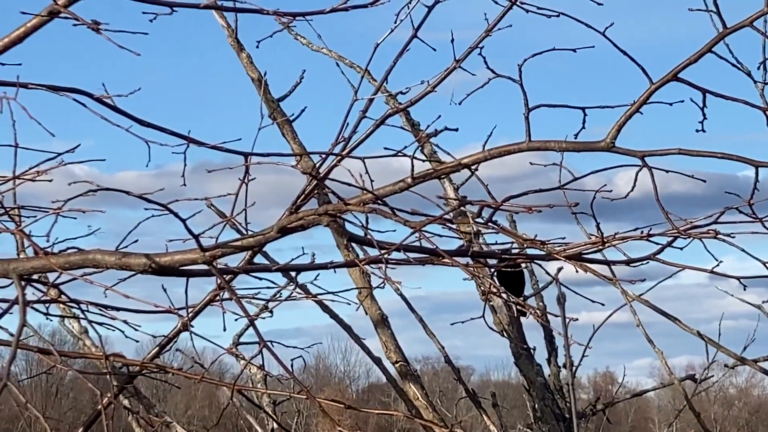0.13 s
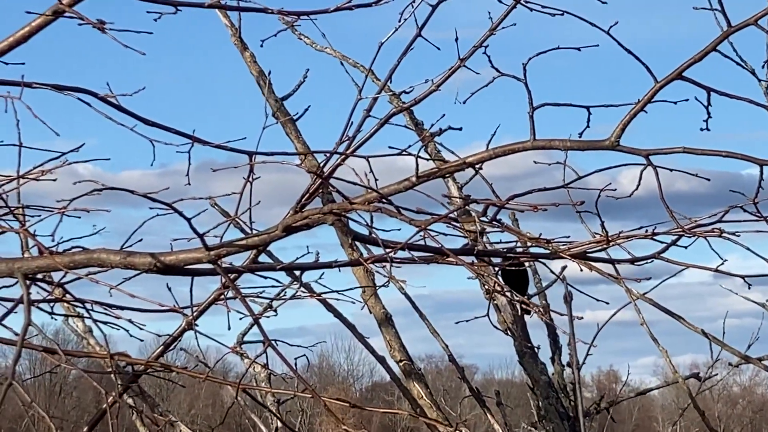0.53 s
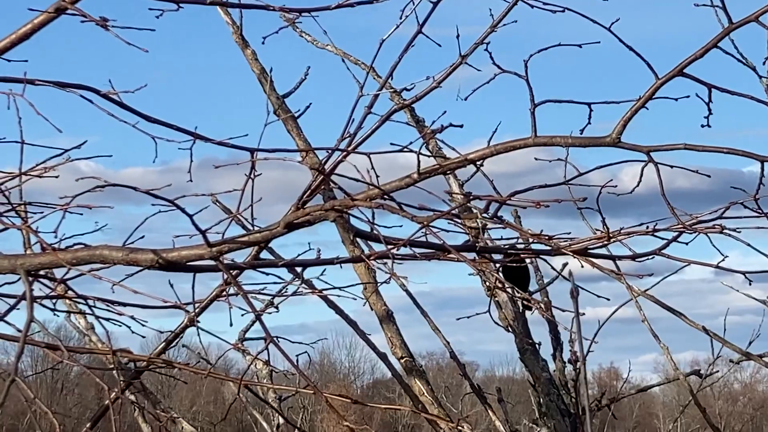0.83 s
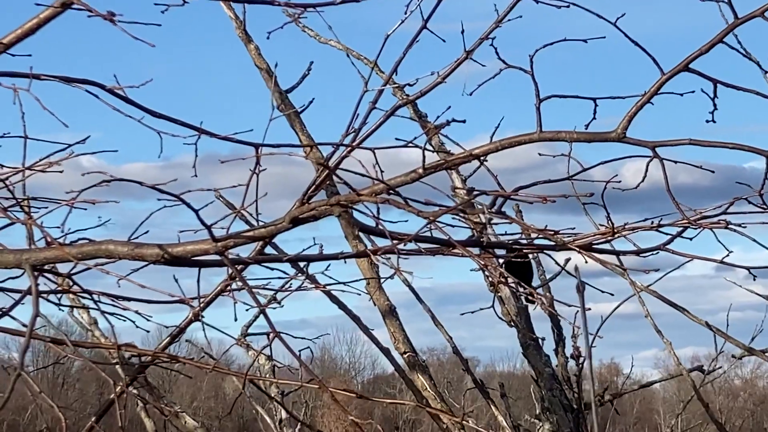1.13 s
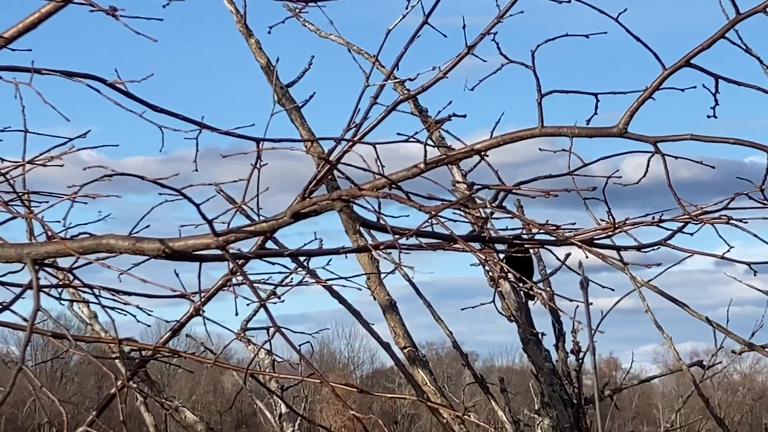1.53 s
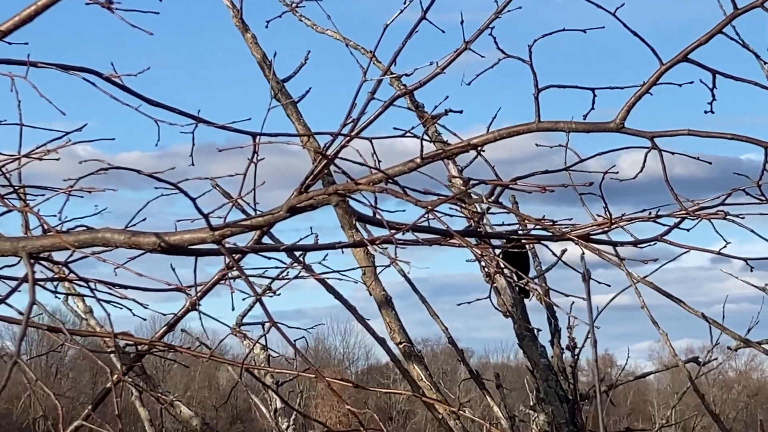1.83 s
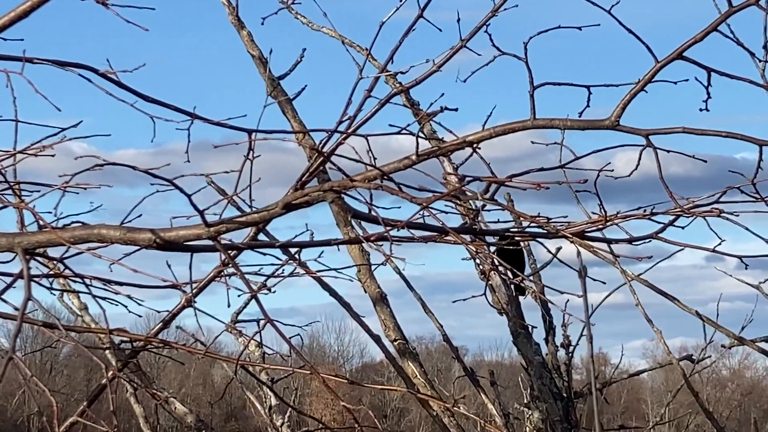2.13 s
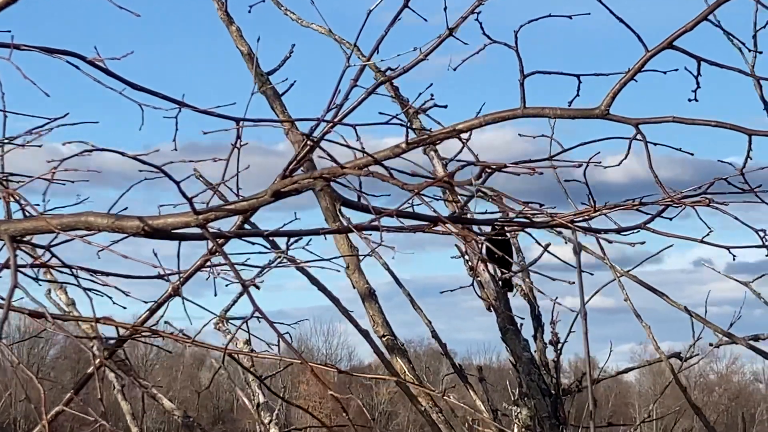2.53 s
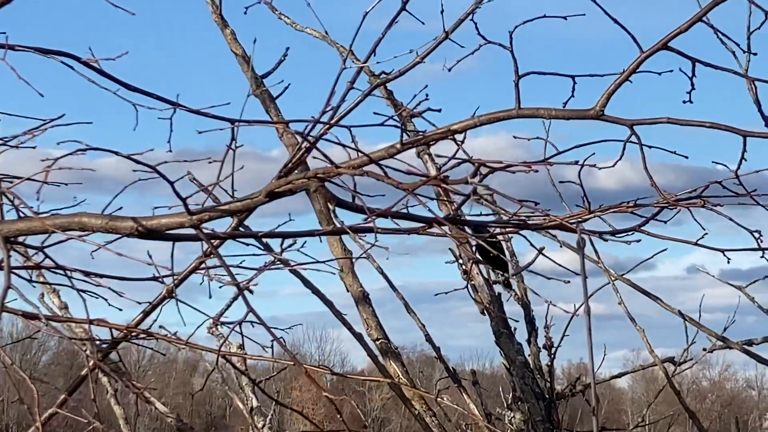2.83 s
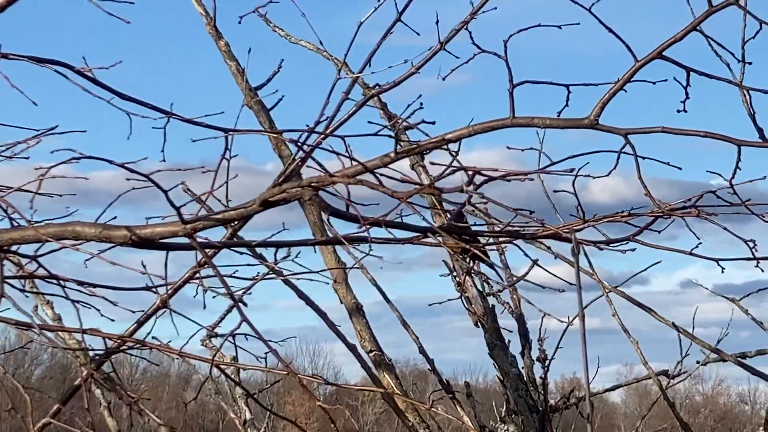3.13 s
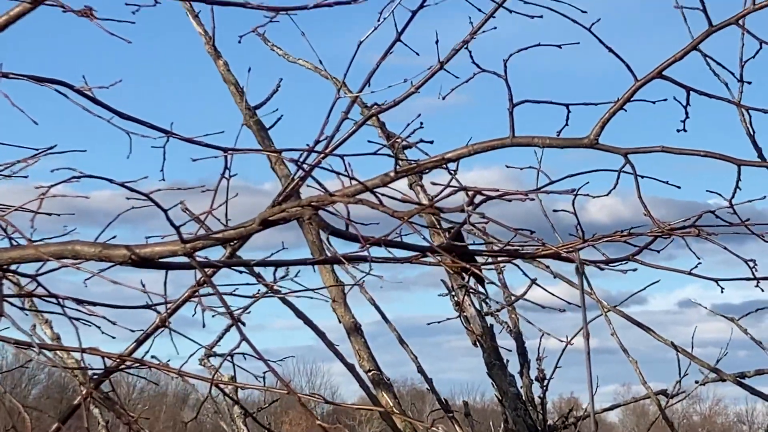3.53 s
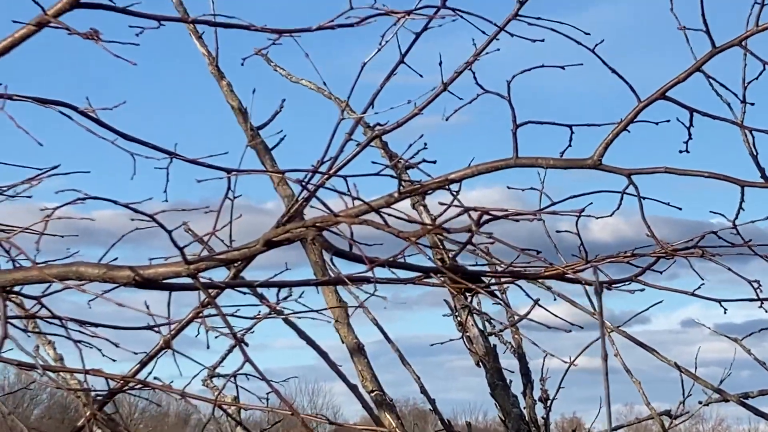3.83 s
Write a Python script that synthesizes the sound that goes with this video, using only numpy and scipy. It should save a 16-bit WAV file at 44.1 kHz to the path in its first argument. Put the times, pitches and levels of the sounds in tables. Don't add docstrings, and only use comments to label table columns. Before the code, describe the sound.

A blackbird's sharp chack, then a gurgle and buzzy trill, over rising wind rumble outdoors

```python
import sys
import numpy as np
from scipy import signal
from scipy.fft import rfft, irfft
from scipy.io import wavfile
from scipy.ndimage import uniform_filter1d

SR = 44100
rng = np.random.default_rng(int(sys.argv[2]) if len(sys.argv) > 2 else 0)


def rack_gain(trim_db):
    fader = np.asarray(trim_db, float)
    return 10 ** (fader / 20)


def wav_out(sig):
    wavfile.write(sys.argv[1], SR, np.round(np.clip(np.atleast_2d(sig).T, -1, 1) * 32767).astype(np.int16))


N = 176400
T = np.arange(N) / SR
FREQS = np.arange(N // 2 + 1) * SR / N
OPPOSITE = np.array([[1], [-1]])


def unit(x):
    return x / np.sqrt(np.mean(x ** 2))


def noise():
    return rng.standard_normal(N)


def band(x, lo_hz, hi_hz, order=2):
    edges = [max(lo_hz, 20), min(hi_hz, SR * .45)]
    return signal.sosfilt(signal.butter(order, edges, "band", fs=SR, output="sos"), x)


def resonance(x, hz, width_hz):
    return band(x, hz - width_hz / 2, hz + width_hz / 2)


def shape(at, attack, hold, release):
    t = T - at
    rise = np.sin(np.pi / 2 * np.clip(t / attack, 0, 1)) ** 2
    return rise * np.exp(-np.clip(t - attack - hold, 0, None) / release)


def tone(hz):
    return np.sqrt(2) * np.sin(2 * np.pi * np.cumsum(hz) / SR)


def walk(rate):
    k = int(SR / rate)
    return unit(uniform_filter1d(uniform_filter1d(noise(), k), k))


def coloured(points):
    p = np.array(points)
    db = np.interp(np.log(FREQS + 1), np.log(p[:, 0]), p[:, 1], left=-60, right=-90)
    return unit(irfft(rfft(noise()) * rack_gain(db), N))


def pan(x, db, lag_s):
    late = irfft(rfft(x) * np.exp(-2j * np.pi * FREQS * lag_s), N)
    return np.array([x * rack_gain(db / 2), late * rack_gain(-db / 2)])


def burst(rows, kernel):
    out = np.zeros(N + SR)
    for s, db, *rest in rows:
        k = kernel(*rest)
        start = int(s * SR)
        out[start:start + len(k)] += rack_gain(db) * k
    return out[:N]


# (frequency [Hz], level [dB])
ROAD_COLOUR = [(88, -34.5), (150, -1), (588, -5.5), (1160, -11.5), (3640, -40), (4500, -63), (5850, -73.5),
               (9900, -120)]
# (centre [Hz], width [Hz], level [dB])
HISS_HUMPS = [(4500, 5700, -88.5), (6120, 810, -85), (8000, 14000, -90), (10840, 1500, -91)]


def traffic():
    wide_treble = band(coloured(ROAD_COLOUR), 830, 15000) * rack_gain(-1.0)
    wide_bass = band(coloured(ROAD_COLOUR), 110, 900) * rack_gain(-8.5)
    road = coloured(ROAD_COLOUR) + (wide_treble + wide_bass) * OPPOSITE
    hiss = 0
    for hz, width_hz, db in HISS_HUMPS:
        hump = resonance(rng.standard_normal((2, N)), hz, width_hz)
        hiss = hiss + rack_gain(db) * hump * np.sqrt(SR / 2 / width_hz)
    whine = rack_gain(-93) * tone(10050 + 0 * T) * (T < 1.9)
    swell_db = .8 * walk(0.86)
    return rack_gain(-56.5 + swell_db) * road + hiss + whine


GUST_HZ = 83.92
# (time [s], peak level [dB], start pitch [octaves over the gust tone])
EDDIES = [(1.066, -40, 2.13), (1.637, -46, 2.5), (1.774, -45, 2.2), (2.023, -43, 2.03), (2.141, -34.5, 2.1),
          (2.217, -40, 2.12), (2.302, -43, 2.2), (2.357, -38, 2.03), (2.461, -40.5, 2.17),
          (2.598, -27.5, 2.15), (2.71, -43, 1.8), (2.79, -42.5, 1.9), (2.83, -19, 2.22),
          (2.856, -21.5, 2.1), (2.946, -29.5, 1.96), (2.979, -24.5, 1.97), (3.033, -44, 2.1),
          (3.097, -42, 2.26), (3.131, -42, 2.6), (3.194, -43, 2), (3.334, -38, 2.1), (3.403, -42.5, 2.1),
          (3.472, -32, 2.06), (3.505, -29, 2.4), (3.547, -26.5, 2.24), (3.556, -26.5, 2.37),
          (3.637, -32.5, 2.4), (3.657, -26, 2.06), (3.682, -36.5, 2.24), (3.72, -42.5, 2.6),
          (3.771, -31.5, 2.04), (3.803, -22.5, 2.3), (3.825, -22.5, 2.23), (3.907, -31, 3),
          (3.935, -26, 2.33)]


def snaps():
    t = T[:SR // 12]
    envelope = shape(0, 0.0023, 0.0011, 0.013)[:len(t)]
    fall_oct = 1.254 * (np.exp(-t / 0.016) - 1)

    def eddy(octaves):
        hz = GUST_HZ * 2 ** (octaves + fall_oct)
        return envelope * np.sin(2 * np.pi * np.cumsum(hz) / SR)

    return rack_gain(-2) * burst(EDDIES, eddy)


# (time [s], rumble level [dB], twig rustle level [dB])
WIND_RISE = [(0, -47, -65.5), (.6, -43, -62), (1., -49, -62.5), (1.5, -48, -67), (1.9, -44.5, -60),
             (2.2, -40.5, -58), (2.598, -35.5, -55), (3.001, -30, -56.5), (3.399, -35.5, -54),
             (3.599, -32.5, -55), (4, -25.5, -54.5)]
# (time [s], peak level [dB], decay [s], pitch fall [octaves])
PORT_GUSTS = [(1.072, -26, 0.057, 0.85), (1.188, -33, 0.014, 0.28), (1.601, -33, .04, 0.31),
              (1.636, -29.5, 0.053, 0.71), (2.139, -32, 0.025, 1.7), (2.356, -35.5, 0.029, 1.5),
              (2.46, -31, 0.041, 1.7), (2.603, -16, 0.032, 1.4), (2.683, -24, 0.044, 1.5),
              (2.773, -24, 0.087, 1.7), (2.832, -15, 0.022, 1.7), (2.885, -19, 0.043, .7),
              (2.946, -25.5, 0.063, 1.7), (3.04, -31.5, 0.2, 1.7), (3.115, -15, 0.016, 1.5),
              (3.191, -28, 0.03, 1.7), (3.332, -18, 0.02, 0.94), (3.407, -24.5, 0.05, 1.23),
              (3.438, -22, 0.048, 1.7), (3.499, -20, 0.083, 1.681), (3.545, -22.5, 0.057, 1.5),
              (3.595, -24, 0.027, 1.2), (3.653, -26, 0.05, 1.9), (3.725, -30, 0.054, 1.7),
              (3.783, -15.5, 0.058, 1.5), (3.843, -22.5, 0.09, 1.3), (3.899, -13.5, 0.034, 1.7)]
# (frequency [Hz], density [dB per Hz])
RUMBLE_COLOUR = [(12, -52), (20, -6), (81, 5), (235, -22), (600, -32), (780, -42), (1320, -120)]


def wind():
    s, rumble_db, rustle_db = np.array(WIND_RISE).T
    flutter_db = 2.5 * np.clip(walk(34), -2, 1)
    size = rack_gain(np.interp(T, s, rumble_db) + flutter_db)
    wobble = walk(71.7)
    grain = 0.85 + np.tanh(0.98 * walk(274))
    mid = size * coloured(RUMBLE_COLOUR) + snaps()
    for at, peak_db, decay, octaves in PORT_GUSTS:
        swell = rack_gain(peak_db - 7) * shape(at - .004, 0.017, 0.00087, decay)
        fall_oct = octaves * np.exp(-np.clip(T - at, 0, 1) / 0.02406)
        mid = mid + swell * grain * tone(GUST_HZ * 2 ** (fall_oct + .25 * wobble))
        size = size + swell
    limit = .15
    buffet = band(limit * np.tanh(mid / limit), 31.0, 1200)
    crackle = rack_gain(np.interp(T, s, rustle_db) + 1.7 * walk(36) + 2 * walk(210))
    rustle = crackle * np.array([unit(band(noise(), 420, 1547)) for _ in range(2)])
    port_difference = rack_gain(-9) * size * coloured(RUMBLE_COLOUR) * OPPOSITE
    return buffet + rustle + port_difference


# (time [s], peak level [dB])
REED_CRACKS = [(2.0248, -49.5), (2.0686, -43), (2.088, -46.5), (2.144, -45), (2.192, -44), (2.2413, -39),
               (2.31, -54), (2.3248, -45.5), (2.355, -40.5), (2.3795, -46.5), (2.4065, -53.5),
               (3.5773, -33.5), (3.755, -49.5)]


def reeds():
    swell = burst(REED_CRACKS, lambda: rack_gain(-60 * T[:SR // 20] / 0.0073))
    return rack_gain(-14.5) * swell * np.array([unit(band(noise(), 1000, 1800, order=1)) for _ in range(2)])


# (time [s], level [dB], centre [Hz], width [Hz], 60 dB decay [s])
TWIG_TICKS = [(.583, -42, 1236, 1490, 0.033), (0.5848, -64, 5350, 3980, 0.12),
              (1.0286, -56.5, 8000, 8000, 0.064), (1.598, -67, 6320, 4980, 0.041),
              (2.9233, -54.5, 7570, 1190, 0.0081), (2.9367, -50.5, 7140, 1196, 0.012),
              (2.9552, -57, 7280, 1176, 0.061), (2.9558, -57, 10670, 1910, 0.024),
              (3.406, -64, 4500, 4770, 0.24), (3.9613, -40.5, 1570, 4870, 0.0016)]
LEFT_PORT_TICKS = [
    (1.0183, -41.5, 704, 298, 0.019),
    (1.0186, -44, 2600, 3810, 0.0087),
]


def ticks(rows):
    out = 0
    for s, db, hz, width_hz, t60 in rows:
        decay = rack_gain(db - 60 * np.clip(T - s, 0, 1) / t60) * (T > s)
        out = out + decay * unit(resonance(noise(), hz, width_hz))
    return out


def woods(x):
    t = T[:SR]
    fall = rack_gain(-60 * t / .25) + rack_gain(-22 - 60 * t / .7)
    patchy = rack_gain(4 * walk(42.0)[:SR])
    ir = rng.standard_normal((2, SR)) * fall * patchy * np.clip(t / 0.017, 0, 1)
    return signal.fftconvolve(x[None], ir / np.sqrt(np.sum(ir ** 2) / 2), axes=1)[:, :N]


# (time [s], length [s], pitch [Hz], glide [Hz], level [dB])
SONG_WHISTLES = [(0.477, 0.013, 3320, -600, -68), (1.281, 0.024, 2850, -47.5, -70.5),
                 (1.89, 0.072, 2700, 19.5, -68), (2.533, 0.0033, 1987, 34.5, -44.5),
                 (2.533, 0.0042, 2234, 35, -44), (2.538, 0.023, 2600, 9, -56.5),
                 (2.562, .012, 2190, -11.5, -76.5), (2.57, 0.025, 5065, 17.5, -50),
                 (2.612, 0.013, 5000, 7, -72), (3.399, 0.035, 4450, -950, -58),
                 (3.388, 0.11, 4760, -250, -72.5), (3.44, 0.023, 2816, -51, -59.5),
                 (3.458, 0.16, 3410, 201, -66), (3.61, 0.065, 3740, 96, -77),
                 (3.565, 0.018, 11500, -9.5, -70.5)]
TRUNK_RETURNS = [
    (1.742, .012, 1600, -450, -50),
    (1.782, .022, 3870, 0, -46),
    (1.814, .01, 3870, 0, -52),
    (2.122, .03, 3870, 0, -72),
]


def whistles(rows):
    smear, waver = walk(460), 15 * walk(200)
    out = 0
    for s, length, hz, glide, db in rows:
        pitch = hz + glide * np.clip((T - s) / length, 0, 1) + waver
        level = rack_gain(db) * (smear if db < -63 else 1)
        out = out + level * tone(pitch) * shape(s, 0.0033, length, 0.00075)
    return out


# times [s], and the beats counted by then
BEAT_TIMES = [2.605, 2.643, 2.7223, 2.805, 3.0977, 3.35]
BEATS_SO_FAR = [-2, 0, 4, 8, 22, 34]
# (time [s], level [dB], upper voice level [dB], lower voice [Hz], flick [0-1])
TRILL_COURSE = [(2.601, -60.5, 12.5, 2750, .8), (2.633, -48, -2, 2812, 1), (2.799, -49, -0.5, 2772, 0),
                (3.031, -51, 0.5, 2818, 0.8), (3.12, -49.5, -3, 2712, 0.3), (3.33, -49, -5, 2710, 0.03),
                (3.361, -72, -24, 2680, 0)]
# (centre [share of beat], width [share of beat], pitch [Hz], dive [Hz per beat], level [dB])
UPPER_NOTES = [
    (.06, .12, 5040, -300, 1),
    (.13, .09, 3960, -900, 0),
    (.3, .1, 3420, -500, -2),
    (.38, .09, 2360, 200, 0),
]


def trill():
    s, *courses = np.array(TRILL_COURSE).T
    db, upper_db, hz, strength = (np.interp(T, s, course) for course in courses)
    beat = np.interp(T, BEAT_TIMES, BEATS_SO_FAR)
    phase = beat % 1
    flick_at = 0.41
    flick = (phase - flick_at) / 0.06
    bump = strength * np.exp(-flick ** 2 / 2)
    buzz = 1 + 0.65 * np.cos(8 * np.pi * (phase - flick_at))
    gap = 1 - 0.7 * np.cos(np.pi * (phase - .05)) ** 6
    rough = .2
    lower_hz = hz + 620 * flick * bump + 200 * rough * walk(500)
    lower = tone(lower_hz) * buzz * gap * rack_gain(3.5 * bump)
    waver = 300 * rough * walk(600)
    upper = unit(band(noise(), 2100, 4955, order=4)) * rack_gain(-8)
    for at, width, note_hz, dive, note_db in UPPER_NOTES:
        q = (beat - at + .5) % 1 - .5
        swell = np.exp(-(q / width) ** 2 / 2)
        upper = upper + rack_gain(note_db) * tone(note_hz + dive * q + waver) * swell
    singing = (T > BEAT_TIMES[0]) * (T < BEAT_TIMES[-1])
    return rack_gain(db + 2 * walk(87)) * (lower + rack_gain(upper_db) * upper) * singing


# (pitch [Hz], level [dB])
CHACK_VOICES = [(1690, -32), (2175, -26), (2675, -26), (3345, -16.5), (3850, -2), (4445, -21),
                (4940, -29.5), (5510, -28.5), (5990, -27), (6670, -28), (7185, -23.5), (7660, -31),
                (10500, -28), (11520, -24.5)]


def chack(at):
    t = np.clip(T - at, 0, None)
    bend = 1 + 0.06 * np.exp(-t / 0.006) + 0.0033 * walk(320)
    tones = sum(rack_gain(db) * tone(hz * bend) for hz, db in CHACK_VOICES) * shape(at, 0.011, 0.017, 0.009)
    rasp_at, rasp_hz = 0.029, 4550
    fall = np.clip(rasp_hz - 42000 * (t - rasp_at - .005), 3500, rasp_hz)
    rasp = rack_gain(-8) * walk(1400) * tone(fall) * shape(at + rasp_at, 0.008, 0.004, 0.011)
    breath = unit(band(noise(), 2400, 23000, order=1))
    breath = rack_gain(-16.5) * breath * shape(at, 0.00079, 0.06, 0.0017)
    tick_hz = 5800 + 500 - 640000.0 * np.clip(T - at + 0.0011, 0, .01) + 300 * walk(870)
    tick = rack_gain(-14) * tone(tick_hz) * shape(at - .004, 0.0052, 0.0014, 0.003)
    return tones + rasp + breath + tick


def scene():
    chack_s, chack_db, far_chack_s, answer_s = 1.7125, -21, 1.293, 3.39
    call = chack(chack_s)
    earlier = np.roll(call, int((far_chack_s - chack_s) * SR))
    far = rack_gain(-64) * band(earlier, 2570, 5500)
    song = whistles([w for w in SONG_WHISTLES if w[0] < answer_s]) + trill() + far
    answer = whistles([w for w in SONG_WHISTLES if w[0] > answer_s])
    to_woods = rack_gain(-7) * (song + 2 * answer) + rack_gain(chack_db - 24) * call
    near = pan(rack_gain(chack_db) * call + whistles(TRUNK_RETURNS), 0, -2.1e-5)
    near = near + pan(song, 0.24, 4.1e-4)
    near = near + pan(ticks(TWIG_TICKS) + answer, -2.3, 1.5e-4)
    near = near + pan(ticks(LEFT_PORT_TICKS), 13, 1.5e-4)
    echoes = woods(band(to_woods, 800, 11000, order=1))
    return near + echoes + wind() + reeds() + traffic()


# (upper edge [Hz], start [s])
MONO_BANDS = [(250, 1.97), (500, 2.17), (750, 2.47), (900, 3.08), (1050, 3.5)]


def guard(x):
    side, lo = rfft((x[0] - x[1]) / 2), 0
    for hi, s in MONO_BANDS:
        fold = irfft(side * (FREQS >= lo) * (FREQS < hi), N) * np.clip((T - s) / .04, 0, 1)
        x, lo = x - fold * OPPOSITE, hi
    return x


def top_cut(x):
    return signal.sosfilt(signal.butter(12, 12900, fs=SR, output="sos"), x)


def record(dry):
    gap_lo, gap_hi, top_hz = 8800, 9700, 13000
    lost = (FREQS > gap_lo) & (FREQS < gap_hi) | (FREQS > top_hz)
    spec = rfft(guard(dry)) * np.where(lost, rack_gain(-24), 1)
    skirt = (FREQS > gap_lo - 150) & (FREQS < gap_hi + 150) | (FREQS > top_hz - 150)
    spec = spec * uniform_filter1d(np.where(skirt, rack_gain(-12), 1), size=1200)
    treble = irfft(spec * ((FREQS > 5600) & (FREQS < 9700)), N)
    quiet = uniform_filter1d(np.abs(treble), size=1500) < rack_gain(-72)
    masked = uniform_filter1d(1. * ((T > 2.6) & (T < 3.27) & quiet), size=400)
    x = irfft(spec, N) - treble * masked * (1 - rack_gain(-35))
    drop_start, drop_end = 3.8806, 3.904
    x = x * (1 - .7 * sum(np.exp(-((T - s) / .0012) ** 2) for s in (drop_start, drop_end)))
    mix = x * np.where((T > drop_start) & (T < drop_end), .002, 1)
    return top_cut(mix)


dry = scene()
out = record(dry)
wav_out(out)
```